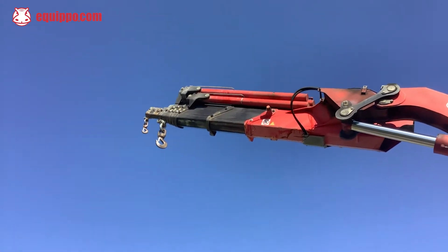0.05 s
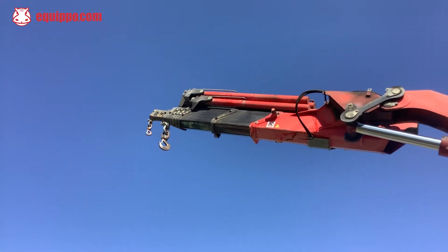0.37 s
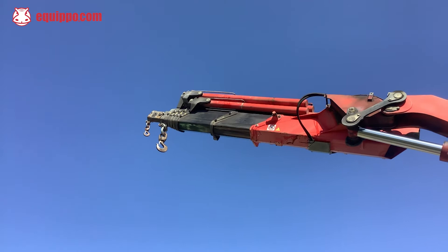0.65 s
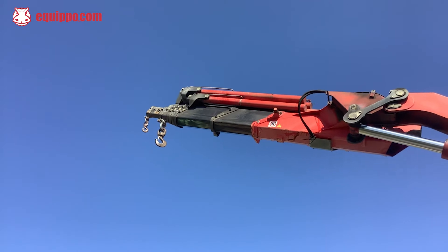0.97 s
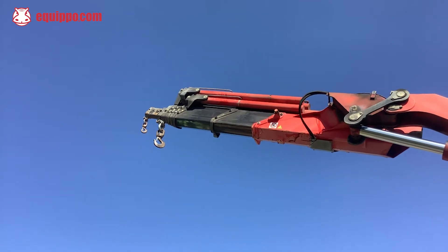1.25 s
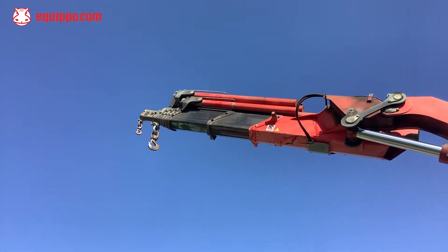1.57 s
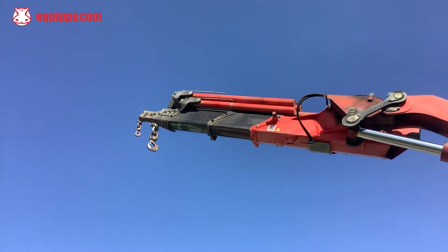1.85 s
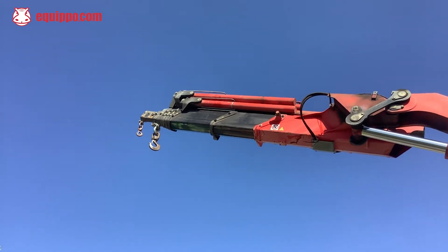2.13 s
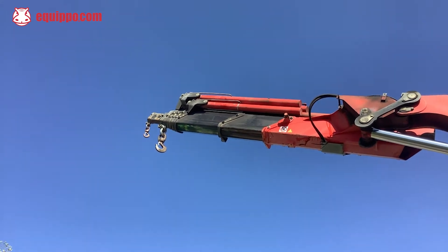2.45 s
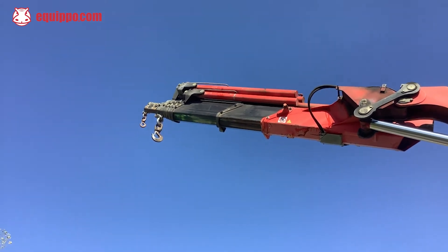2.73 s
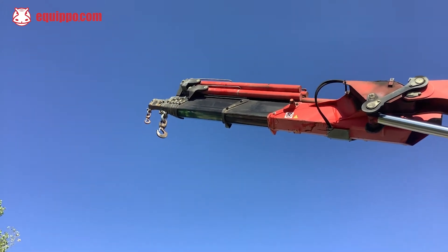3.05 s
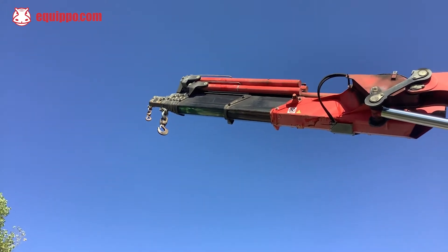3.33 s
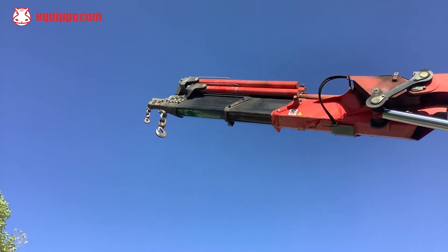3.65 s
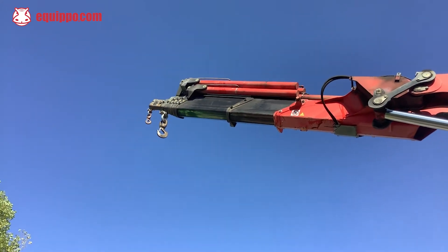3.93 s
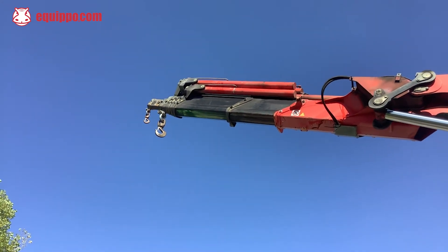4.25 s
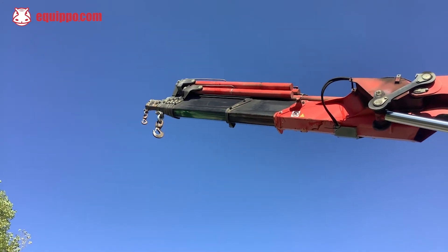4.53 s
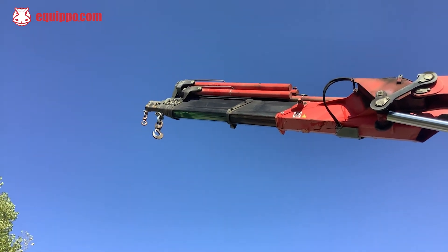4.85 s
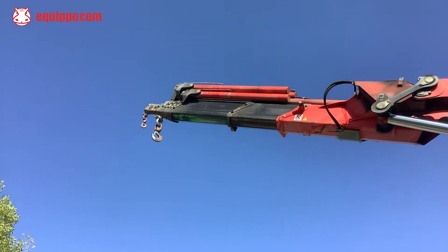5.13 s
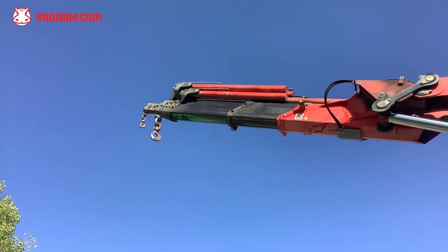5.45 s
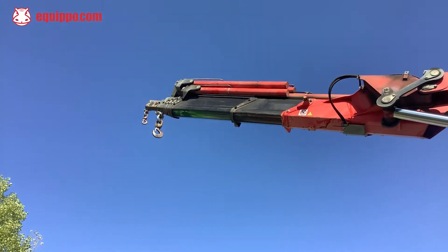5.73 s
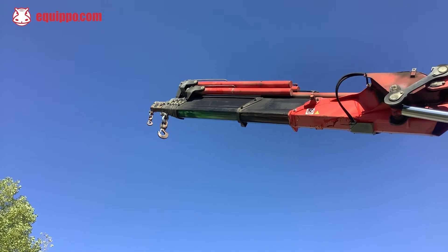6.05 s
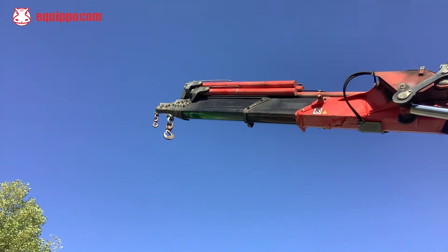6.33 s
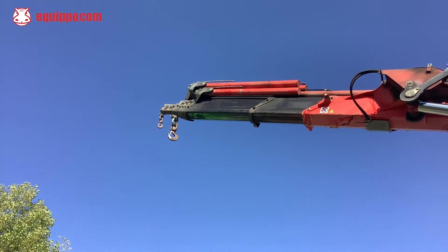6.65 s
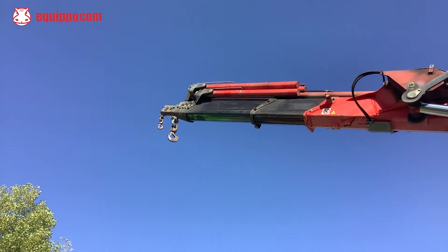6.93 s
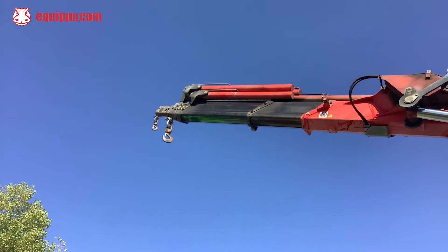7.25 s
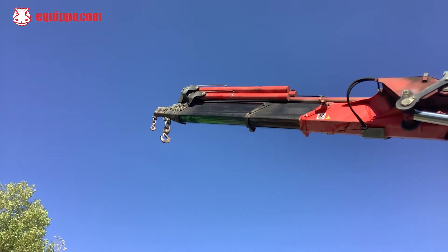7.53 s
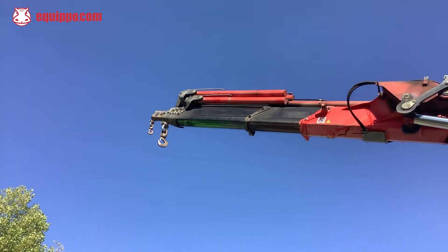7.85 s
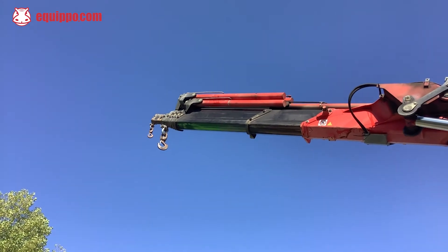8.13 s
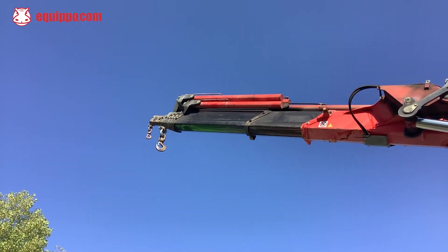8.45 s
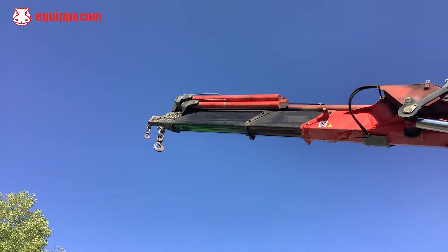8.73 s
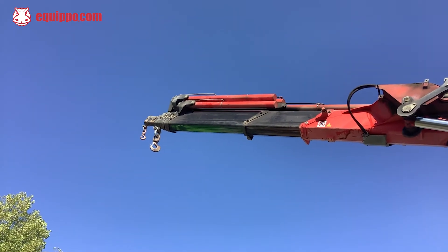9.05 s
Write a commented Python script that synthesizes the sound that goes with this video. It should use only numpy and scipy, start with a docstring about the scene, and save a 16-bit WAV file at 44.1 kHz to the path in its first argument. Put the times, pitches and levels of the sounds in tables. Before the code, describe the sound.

A truck's diesel drones steadily while a crane's hydraulics whine and hiss, with one sharp metal clack midway, outdoors.

```python
"""A truck's six-cylinder diesel runs at a raised idle in an open yard, driving a loader crane's pump.
Its firings drone, its valves clatter, and the timing gears and the pump whine.
Oil hisses through the crane's valves while the boom slides out, with one soft thud near the start.
With a sharp clack the next boom section takes over: the hiss drops, a low hum swells,
and soon the engine begins to knock."""
import sys
import numpy as np
from scipy.fft import rfft, irfft, next_fast_len
from scipy.io import wavfile
from scipy.ndimage import map_coordinates

SR = 44100
rng = np.random.default_rng(int(sys.argv[2]) if len(sys.argv) > 2 else 0)


def wrap_up_sound(samples):
    """Save the sound to the file named by the first command line argument, as 16-bit audio."""
    columns = np.atleast_2d(samples).T
    # keep every value between -1 and 1, then stretch to whole-number steps
    tamed = np.clip(columns, -1, 1)
    steps = np.round(tamed * 32767).astype(np.int16)
    wavfile.write(sys.argv[1], SR, steps)


N = 400428
CYCLE_HZ = 10.0063  # engine cycles a second; in each, the crankshaft turns twice
CLACK_S = 5.079  # when the next boom section takes over


def amp(db):
    """Turn decibels into a factor to multiply by."""
    return 10 ** (np.asarray(db) / 20)

def unit(x):
    """Scale x to an average (rms) level of 1."""
    return x / np.sqrt(np.mean(x ** 2) + 1e-20)

def clock():
    """The time of every sample, in seconds."""
    return np.arange(N) / SR

def wobble(rate):
    """A smooth random curve that takes `rate` new values a second."""
    return map_coordinates(rng.standard_normal(int(N * rate / SR) + 4), [clock() * rate])

def filtered(x, response):
    """Turn each frequency in x up or down by the factor response(hz)."""
    size = next_fast_len(N + 8192)
    return irfft(rfft(x, size) * response(np.fft.rfftfreq(size, 1 / SR)), size)[:N]

def coloured(x, spectrum):
    """Shape x by a curve through (Hz, dB) points, fading above the last one."""
    points_hz, points_db = np.transpose(spectrum)
    def response(hz):
        db = np.interp(np.log(hz + 1), np.log(points_hz + 1), points_db)
        return amp(db) / np.maximum(hz / points_hz[-1], 1) ** 2
    return unit(filtered(x, response))

def noise(spectrum):
    """Steady noise shaped by (Hz, dB) points."""
    return coloured(rng.standard_normal(N), spectrum)

def tone(turns):
    """A pure tone that swings once per turn, starting anywhere in its swing."""
    return np.sqrt(2) * np.sin(2 * np.pi * (turns + rng.random()))

def resonances(x, modes):
    """Make x ring at each (Hz, half-width in Hz, dB) peak."""
    def response(hz):
        return sum(amp(db) / (1 + ((hz - centre) / width) ** 2) for centre, width, db in modes)
    return unit(filtered(x, response))

def pipework(x, depth_db, spacing_hz=45):
    """Pipes and steel plates ring at many close pitches, lifting some and weakening others."""
    bumps = rng.standard_normal(2048)
    bumps_hz = spacing_hz * np.arange(len(bumps))
    return unit(filtered(x, lambda hz: amp(depth_db * np.interp(hz, bumps_hz, bumps))))

def burst(start, rise, hold, t60):
    """Loudness that rises, holds, then falls 60 dB in t60; all times are in seconds."""
    age = clock() - start
    return np.clip(age / rise, 0, 1) * amp(-60 * np.maximum(age - hold, 0) / t60)

def shaft_time(drift, flutter):
    """Seconds as a spinning shaft counts them: its speed drifts slowly and flutters quickly."""
    return np.cumsum(1 + drift * wobble(2) + flutter * wobble(20)) / SR


# The ring of the engine's valve gear. Each row: pitch in Hz, half-width in Hz, relative level in dB.
TAPPET_RING = [(3670, 58, 0), (3960, 70, -3)]

def tappets(cycle, db, depth_db, scatter_db, per_cycle=3):
    """The parts that open the engine's valves tick faintly, never twice alike."""
    ticks = amp(depth_db * np.cos(2 * np.pi * per_cycle * cycle) + scatter_db * wobble(25))
    return amp(db) * resonances(ticks * rng.standard_normal(N), TAPPET_RING)


# The dull noise of the thud. Each row: frequency in Hz, relative level in dB.
THUD_SPECTRUM = [(200, -28), (400, 0), (600, 3), (900, -20), (3000, -50)]

def thud(start_s, db):
    """One soft knock in the crane as the boom runs."""
    return amp(db) * noise(THUD_SPECTRUM) * burst(start_s, rise=0.0025, hold=0.006, t60=0.055)


# The tones of the fan and other belt-driven parts. Each row: pitch in Hz, relative level in dB.
BELT_TONES = [(163, -44.5), (228, -42.5), (364.3, -38), (483, -41.5), (988.5, -37)]

def belt(slip, waver_db):
    """The belt slips a little, so the parts it drives drift out of step with the engine."""
    turning = shaft_time(drift=slip, flutter=slip)
    return sum(amp(db + waver_db * wobble(11)) * tone(hz * turning) for hz, db in BELT_TONES)


# The crane's low hum, then its octave.
# Each row: starting level in dB, rise under load in dB, seconds to make about two thirds of that rise.
HUM_TONES = [(-53, 11, .3), (-50, 13.5, 0.62)]

def hum(turning, pitch_hz=51.85):
    """The oil system hums, and swells once the next boom section is moving."""
    loaded_s = np.maximum(clock() - CLACK_S, 0)
    sound = np.zeros(N)
    for multiple, (db, rise_db, swell_s) in enumerate(HUM_TONES, 1):
        swell = 1 - np.exp(-loaded_s / swell_s)
        sound += amp(db + rise_db * swell) * tone(multiple * pitch_hz * turning)
    return sound


# Oil hiss before (fast) and after (slow) the clack. Each row: frequency in Hz, relative level in dB.
FAST_HISS = [(1500, -4.5), (3200, -0.5), (3800, 2), (4700, -2.5), (6080, -1), (6200, -7), (7400, -5.5),
             (8800, -11), (11800, -14.5), (13200, -24), (15600, -36)]
SLOW_HISS = [(1500, -17), (3200, -2), (3850, 5), (4600, -1.5), (6080, -0.5), (6200, -7), (7400, -8),
             (8200, -12.5), (11000, -15), (13000, -29), (15600, -39)]
# Thin whistles at fast flow. Each row: pitch in Hz, half-width in Hz, relative level in dB.
VALVE_WHISTLES = [(3700, 60, 8), (5640, 69, 6), (7430, 50, -15), (8620, 50, -17), (11170, 50, -16),
                  (11990, 50, -14)]

def oil(fast_db, whistle_db, slow_db, settle_s, flutter_db):
    """Oil hisses and whistles through the valves, then settles quieter and duller after the clack."""
    settled = np.clip((clock() - CLACK_S) / settle_s, 0, 1)
    whistles = amp(whistle_db + 1.5 * wobble(8.2)) * resonances(rng.standard_normal(N), VALVE_WHISTLES)
    fast = amp(fast_db) * pipework(noise(FAST_HISS), depth_db=2.3) + whistles
    slow = amp(slow_db) * pipework(noise(SLOW_HISS), depth_db=2.4)
    hiss = np.sqrt(1 - settled) * fast + np.sqrt(settled) * slow
    return hiss * amp(flutter_db * wobble(60) + 0.33 * wobble(5))


# The pump's pressure ripple. Each row: multiple of the stroke rate, typical level in dB.
PUMP_TONES = [(1, -37.5), (2, -36), (4, -44.5), (6, -30.5), (7, -47)]

def pump(turning, waver_db, throb_db, stroke_hz=168.12):
    """Each piston stroke sends a ripple down the oil lines: a whine that throbs with the engine."""
    strokes = stroke_hz * turning
    whine = sum(amp(db + waver_db * wobble(14)) * tone(multiple * strokes) for multiple, db in PUMP_TONES)
    return whine * amp(throb_db * np.sin(2 * np.pi * CYCLE_HZ * turning))


# The ring of the boom's steel. Each row: pitch in Hz, half-width in Hz, relative level in dB.
STEEL_RING = [(1670, 33, 7), (2050, 36, 1), (3130, 33, -5), (4800, 69, -16), (7140, 28, -23.5),
              (7940, 75, -21), (9430, 26, -13)]
# The scrape in the clack. Each row: frequency in Hz, relative level in dB.
SCRAPE_SPECTRUM = [(500, -21), (1600, 10), (2200, 14), (2900, -3.5), (4000, -3), (4800, 1), (8000, -5),
                   (11000, -10.5), (13800, -17), (14500, -29)]

def clack(scrape_db, ring_db, echo_db):
    """A boom section meets its stop: a short scrape, a ring of steel and a faint echo from the yard."""
    ring = resonances(rng.standard_normal(N), STEEL_RING)
    ring *= burst(CLACK_S, rise=0.0043, hold=0.015, t60=0.11)
    scrape = pipework(noise(SCRAPE_SPECTRUM), depth_db=3.5)
    scrape *= burst(CLACK_S - 0.001, rise=0.0029, hold=0.014, t60=0.076)
    echo = noise(SCRAPE_SPECTRUM) * burst(CLACK_S, rise=0.018, hold=0.026, t60=0.19)
    return amp(scrape_db) * scrape + amp(ring_db) * ring + amp(echo_db) * echo


# The ring of the engine's knock. Each row: pitch in Hz, half-width in Hz, relative level in dB.
KNOCK_RING = [(1430, 79, -1), (1680, 130, 0)]

def knock(cycle, db, cycle_offset, t60, start_s, swell_s):
    """As the load builds, one cylinder starts to knock, once a cycle."""
    age_s = (cycle - cycle_offset) % 1 / CYCLE_HZ
    blows = resonances(rng.standard_normal(N) * amp(-60 * age_s / t60), KNOCK_RING)
    return amp(db) * blows * np.clip((clock() - start_s) / swell_s, 0, 1)


def firing(cycle, depth_db, uneven_db, cylinders=6):
    """Loudness over the cycle: one swell for each cylinder, each with its own strength."""
    strengths_db = uneven_db * unit(rng.standard_normal(cylinders))
    cylinder_db = np.interp(cycle * cylinders, np.arange(cylinders), strengths_db, period=cylinders)
    return unit(amp(depth_db * np.cos(2 * np.pi * cylinders * cycle) + cylinder_db))


# The noise of burning fuel and cooling air. Each row: frequency in Hz, relative level in dB.
ROAR_SPECTRUM = [(28, -36), (50, -17), (85, -16.5), (220, -2), (400, -4.5), (570, -4), (820, -0.5),
                 (1050, -7.5), (1330, -1.5), (1750, -2), (2100, -3.5), (2400, -8.5), (3000, -16.5),
                 (6000, -44)]

def roar(cycle, db):
    """Burning fuel and cooling air make a rush that pulses with the firings."""
    pulses = firing(cycle, depth_db=-1.2, uneven_db=0.8)
    rush = coloured(rng.standard_normal(N) * pulses, ROAR_SPECTRUM)
    return amp(db + 0.7 * wobble(4.6)) * rush


# The engine's repeating clatter. Each row: frequency in Hz, relative level in dB.
CLATTER_SPECTRUM = [(38, -35), (50, -46), (90, -7.5), (220, 0), (400, -11), (570, -9.5), (680, -6),
                    (950, 0.5), (1240, -2.5), (1360, -11.5), (1450, -4.5), (1850, -3.5), (2050, 1.5),
                    (2250, -8), (2700, -25.5), (6000, -41)]

def clatter(cycle, tones, db, lope_db, size=4096):
    """Valves and fuel injectors rattle the same way every cycle, so one cycle of noise is looped."""
    position = np.arange(size) / size
    lope = amp(lope_db * np.cos(2 * np.pi * position))  # one side of the cycle hits harder
    spectrum = rfft(rng.standard_normal(size) * lope * firing(position, depth_db=1.5, uneven_db=0.8))
    spectrum /= np.sqrt(np.abs(spectrum) + 1e-9)  # soften chance peaks
    spectrum[[int(multiple) for multiple, _ in tones]] = 0  # leave gaps for the engine's clear tones
    looped = map_coordinates(irfft(spectrum), [cycle % 1 * size], mode="grid-wrap")
    return amp(db) * coloured(looped, CLATTER_SPECTRUM)


# The ring of the engine block. Each row: multiple of the cycle rate, relative level in dB.
BLOCK_TONES = [(11, -41.5), (84, -37.7), (106, -40.7), (117, -39), (161, -43.2), (176, -42.5)]

def drone_tones(gain_db, base_db=-46, exhaust_hz=150, exhaust_octaves=0.49, exhaust_db=14):
    """List the (multiple of the cycle rate, dB) tones of the crankshaft, the firings and the block."""
    levels = {multiple: base_db for multiple in range(8, 23, 2)}  # unequal cylinders shake the crank
    for multiple in range(6, 37, 6):  # six firings a cycle, louder near the pitch the exhaust rings at
        octaves_away = np.log2(multiple * CYCLE_HZ / exhaust_hz)
        levels[multiple] = base_db + exhaust_db * np.exp(-(octaves_away / exhaust_octaves) ** 2)
    levels.update(BLOCK_TONES)
    # below 105 Hz, tones pass less easily into the air and lose 2.5 dB an octave
    return [(multiple, db + gain_db - 2.5 * max(np.log2(105 / (multiple * CYCLE_HZ)), 0))
            for multiple, db in levels.items()]


# The whine of the timing gears. Each row: teeth meeting per cycle, relative level in dB.
GEAR_TONES = [(201, -30.4), (210, -35.4)]

def engine(cycle, drone_db, gears_db, waver_db):
    """The diesel: a wavering drone and gear whine, with clatter and roar in step."""
    tones = drone_tones(drone_db) + [(teeth, db + gears_db) for teeth, db in GEAR_TONES]
    tonal = sum(amp(db + waver_db * wobble(10)) * tone(multiple * cycle) for multiple, db in tones)
    return tonal + clatter(cycle, tones, db=-26.0, lope_db=1.5) + roar(cycle, db=-27.5)


def scene():
    """Add up the truck and its crane, both driven by one shaft."""
    turning = shaft_time(drift=0.0002913, flutter=0.00065)
    cycle = CYCLE_HZ * turning  # engine cycles counted so far
    cycle += 0.00022 * np.sin(2 * np.pi * cycle)  # the crank twists a little over each cycle
    load = np.clip((clock() - CLACK_S) / 2.2, 0, 1)  # the engine works a little harder after the clack
    truck = amp(0.5 * load) * engine(cycle, drone_db=1.68, gears_db=0.25, waver_db=0.92)
    truck += amp(load - 1.8) * belt(slip=0.0013, waver_db=2.0)
    truck += tappets(cycle, db=-52, depth_db=7, scatter_db=4.5)
    truck += knock(cycle, db=-34, cycle_offset=0.25, t60=0.045, start_s=6.5, swell_s=1.4)
    hiss = oil(fast_db=-39.5, whistle_db=-55.0, slow_db=-43.0, settle_s=0.1, flutter_db=0.6)
    crane = pump(turning, waver_db=1.0, throb_db=-0.9) + hum(turning) + hiss
    crane += clack(scrape_db=-19.0, ring_db=-22, echo_db=-30.5)
    crane += thud(start_s=0.147, db=-20.5)
    return truck + crane

def record(dry):
    """One channel, with the very highest treble cut away."""
    return filtered(dry, lambda hz: hz < 15720)[None]


dry = scene()
out = record(dry)
wrap_up_sound(out)
```